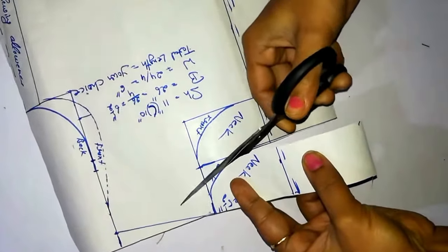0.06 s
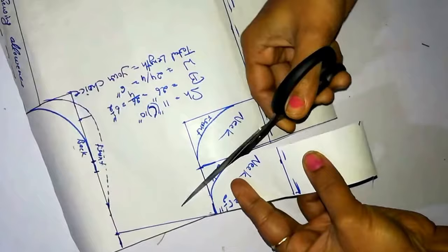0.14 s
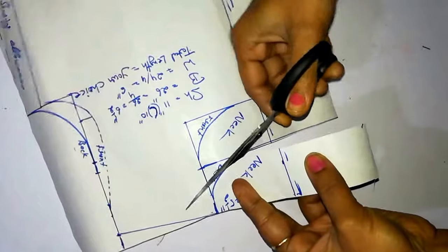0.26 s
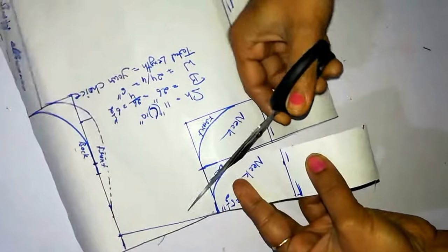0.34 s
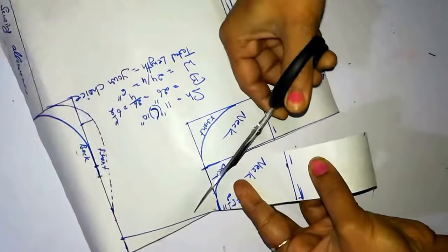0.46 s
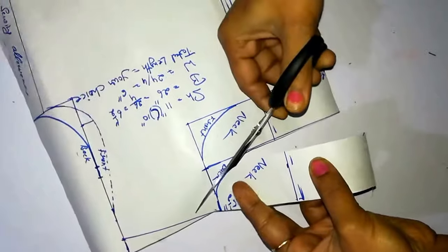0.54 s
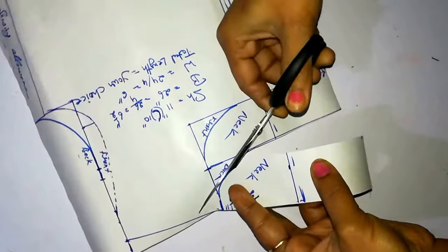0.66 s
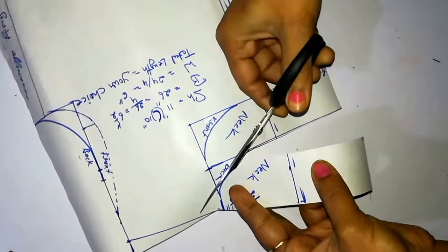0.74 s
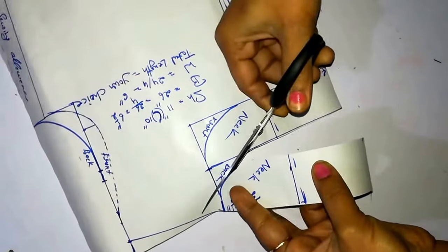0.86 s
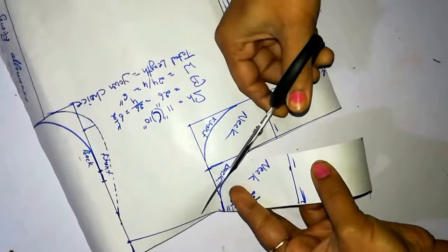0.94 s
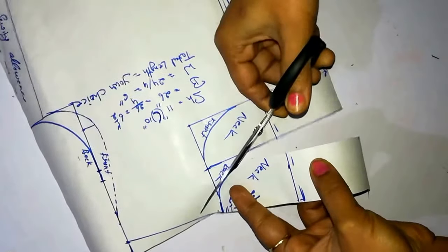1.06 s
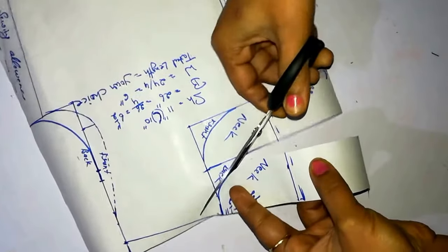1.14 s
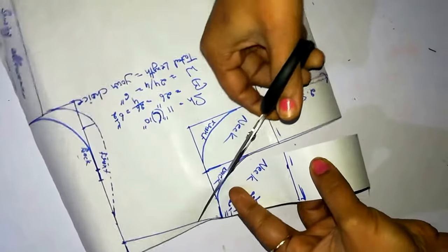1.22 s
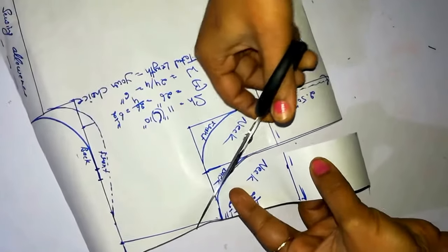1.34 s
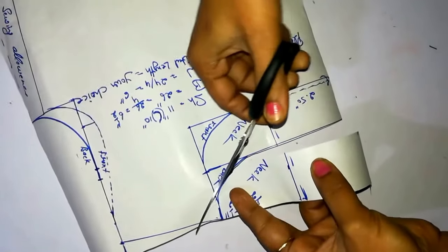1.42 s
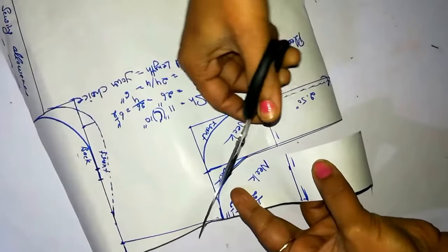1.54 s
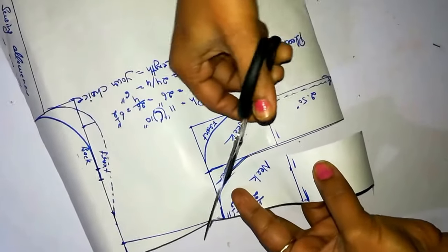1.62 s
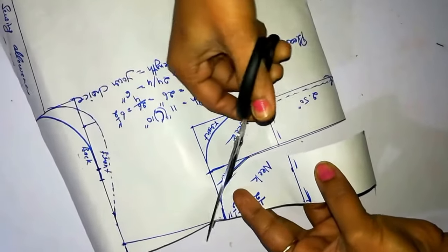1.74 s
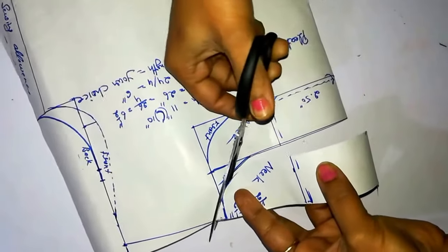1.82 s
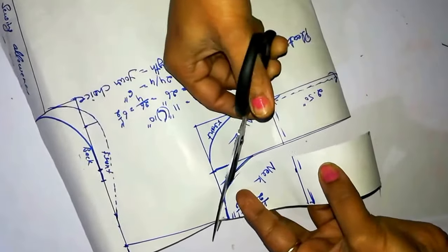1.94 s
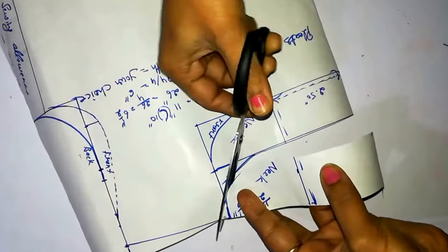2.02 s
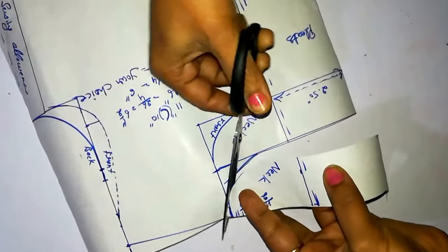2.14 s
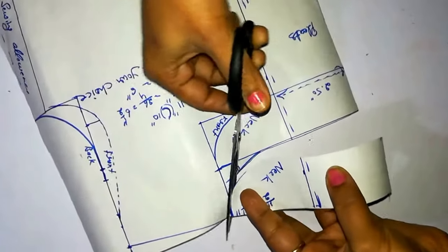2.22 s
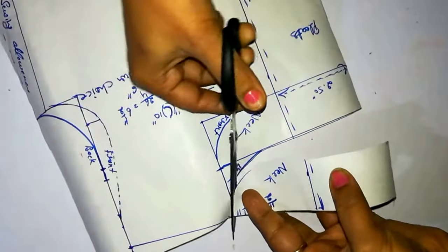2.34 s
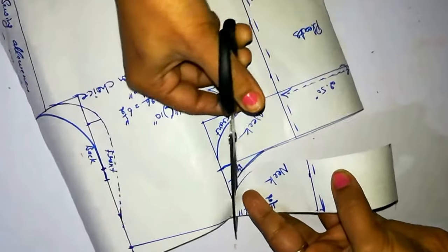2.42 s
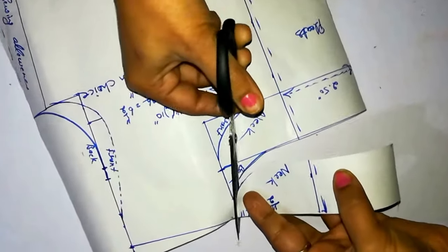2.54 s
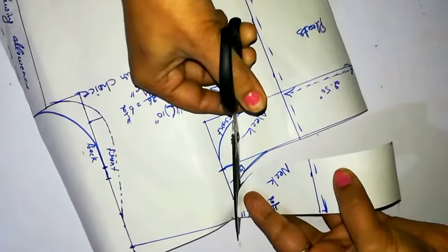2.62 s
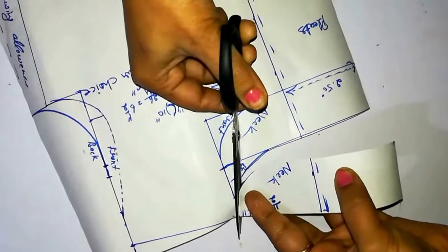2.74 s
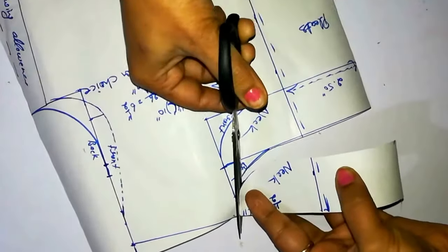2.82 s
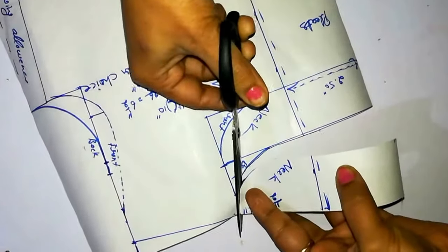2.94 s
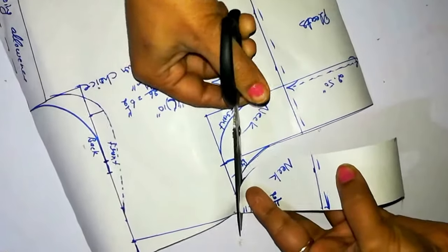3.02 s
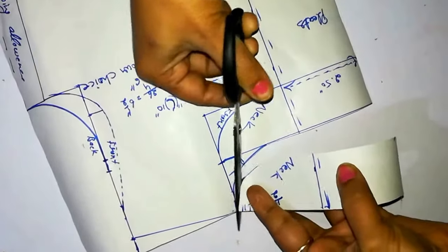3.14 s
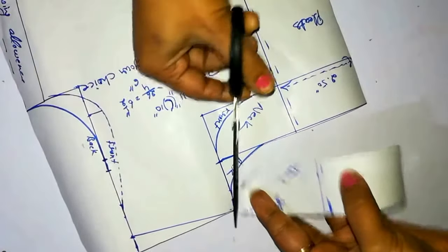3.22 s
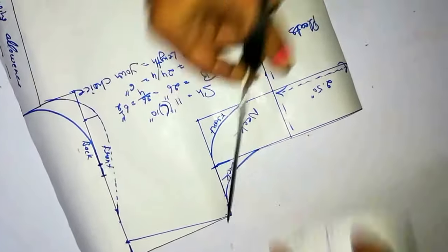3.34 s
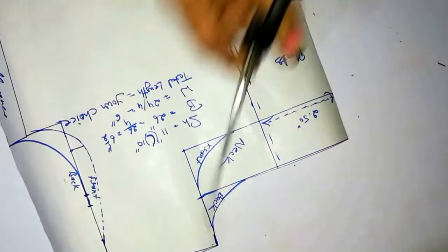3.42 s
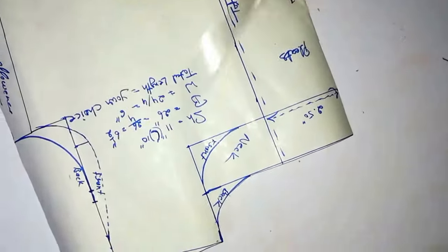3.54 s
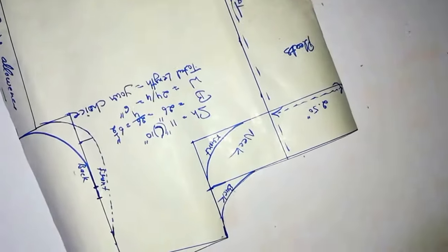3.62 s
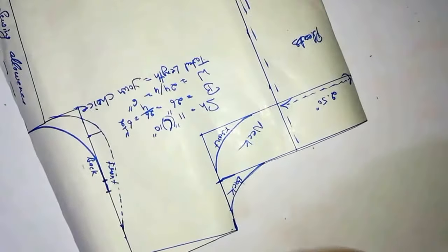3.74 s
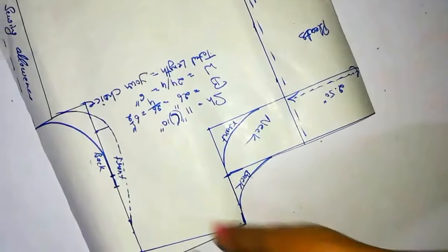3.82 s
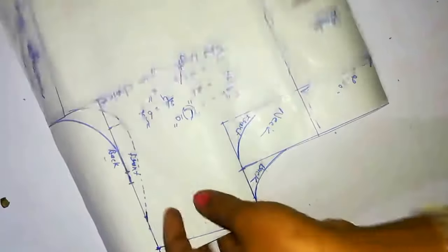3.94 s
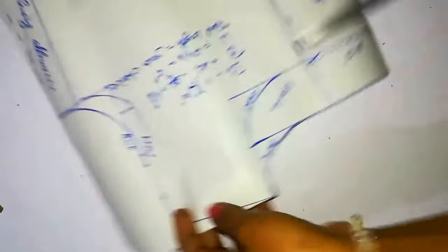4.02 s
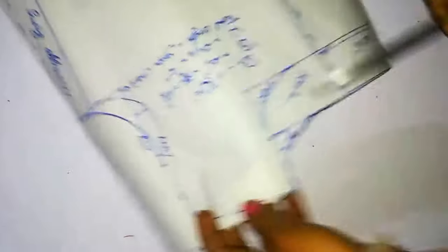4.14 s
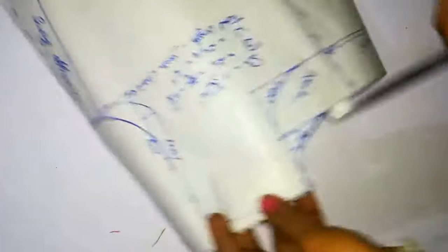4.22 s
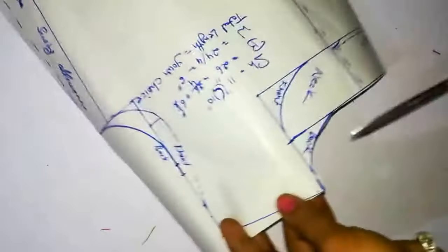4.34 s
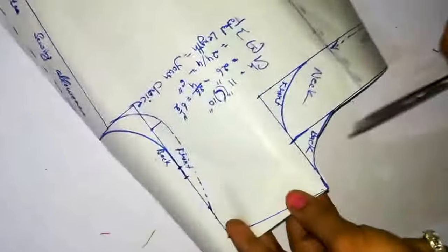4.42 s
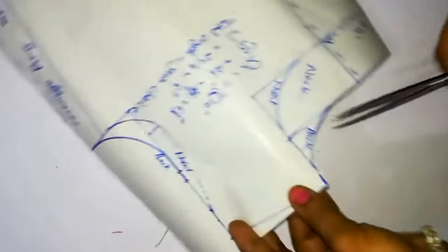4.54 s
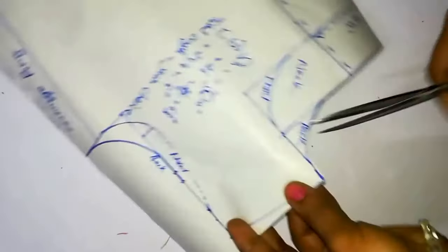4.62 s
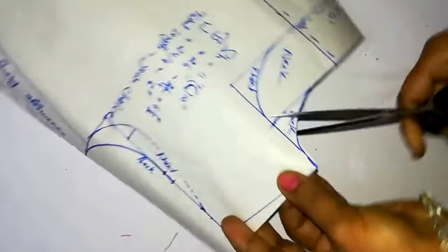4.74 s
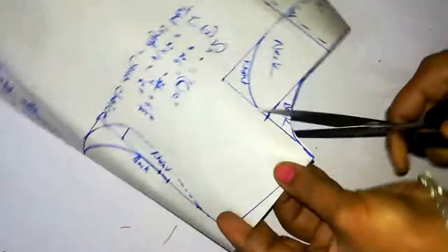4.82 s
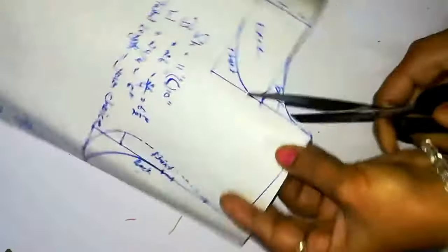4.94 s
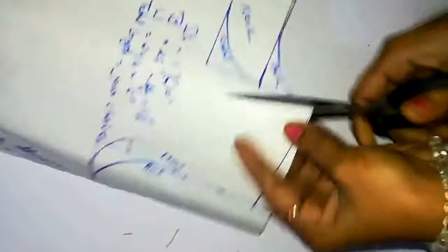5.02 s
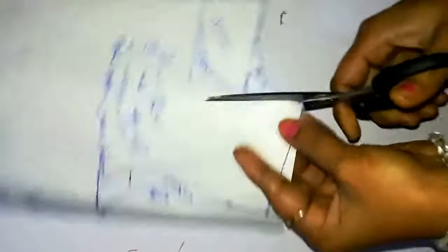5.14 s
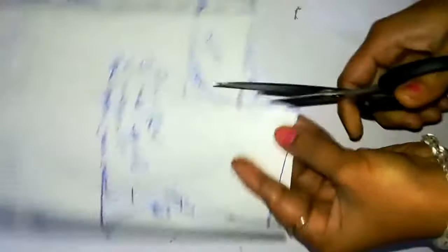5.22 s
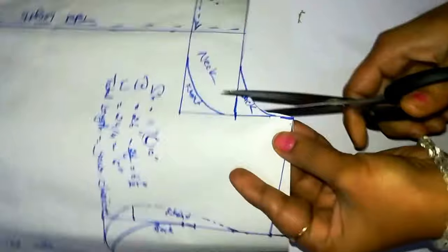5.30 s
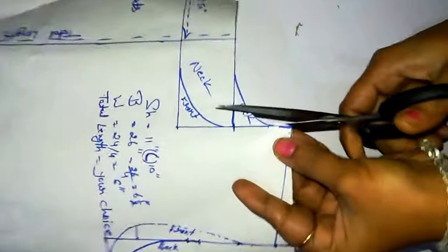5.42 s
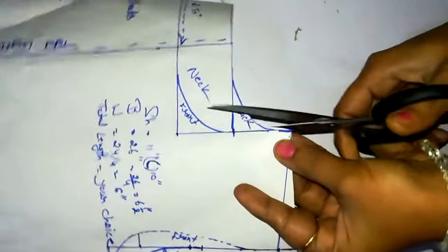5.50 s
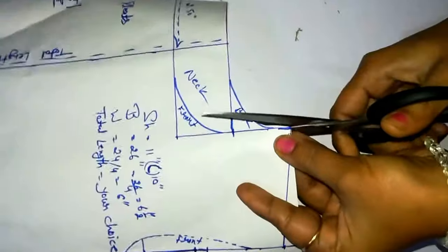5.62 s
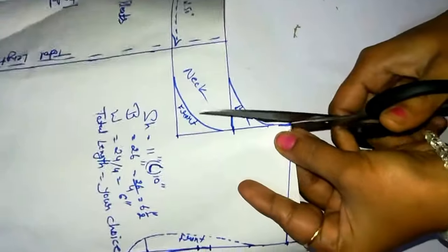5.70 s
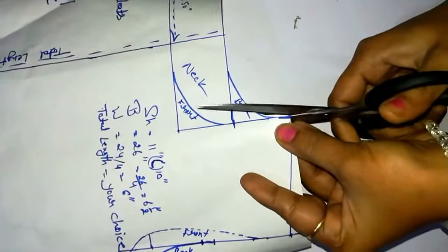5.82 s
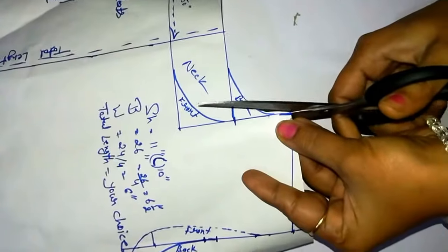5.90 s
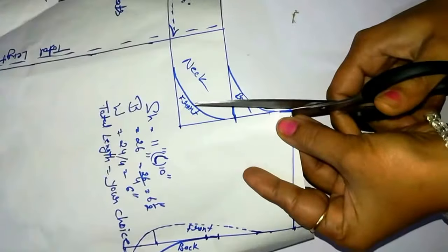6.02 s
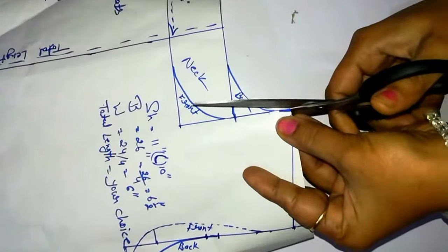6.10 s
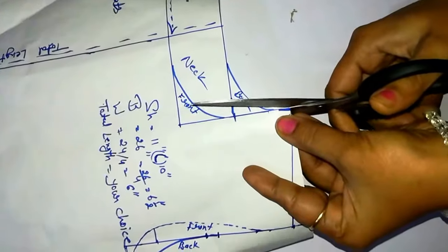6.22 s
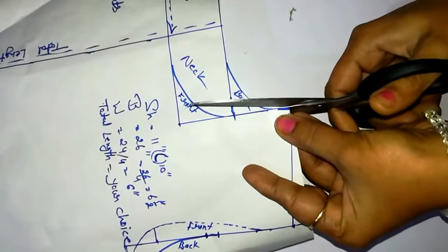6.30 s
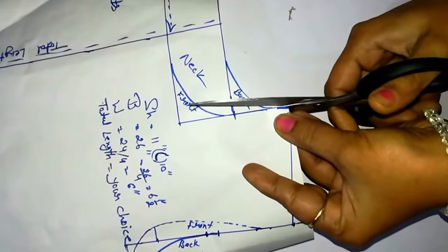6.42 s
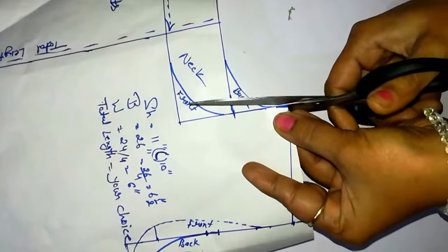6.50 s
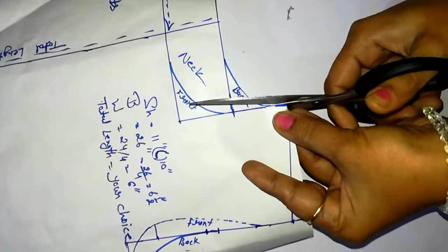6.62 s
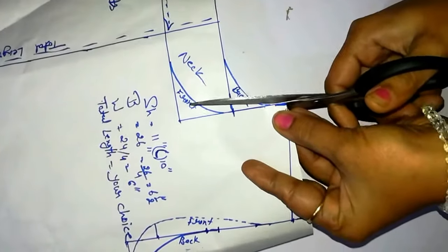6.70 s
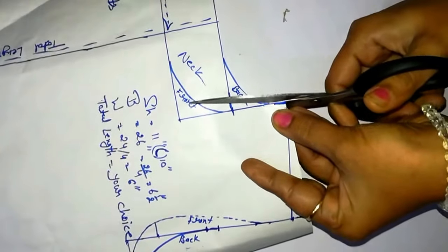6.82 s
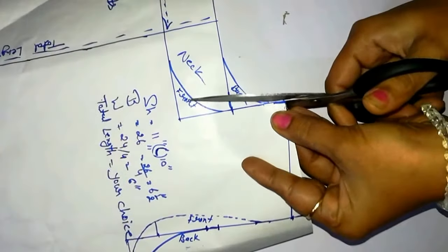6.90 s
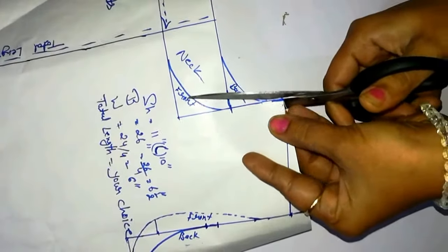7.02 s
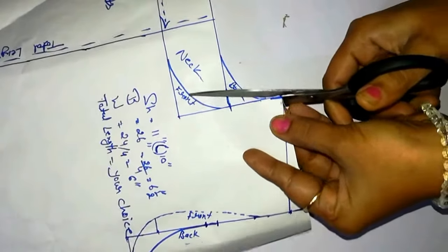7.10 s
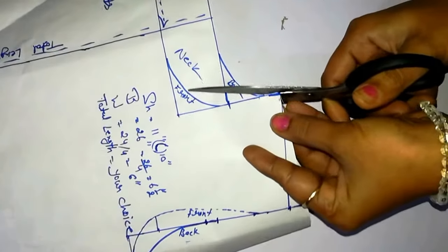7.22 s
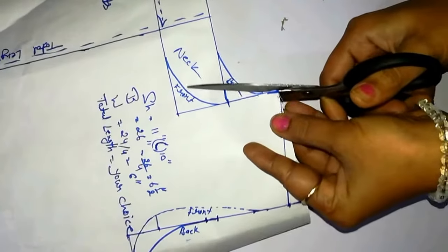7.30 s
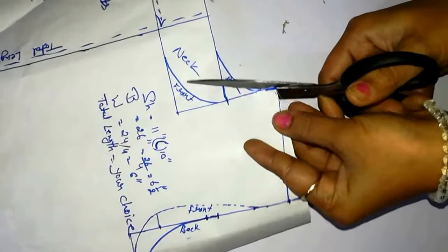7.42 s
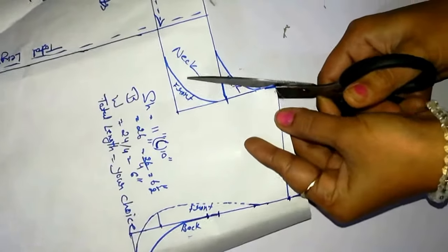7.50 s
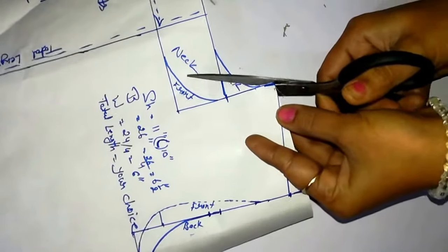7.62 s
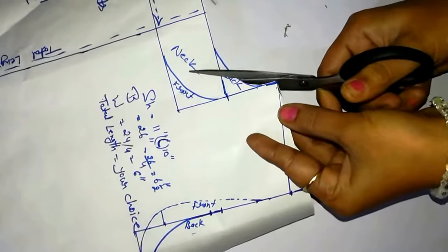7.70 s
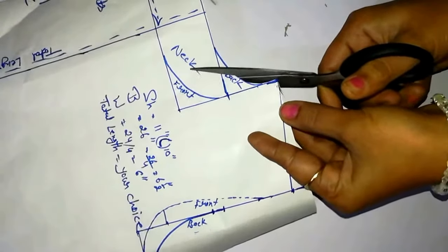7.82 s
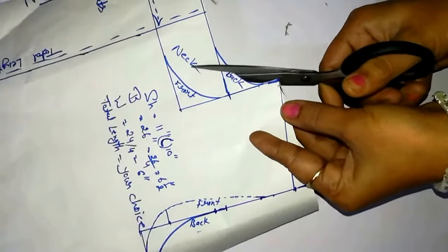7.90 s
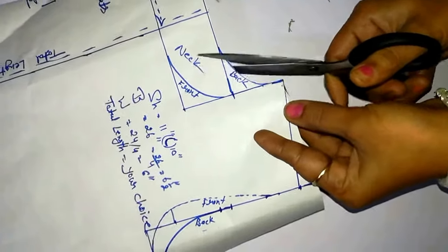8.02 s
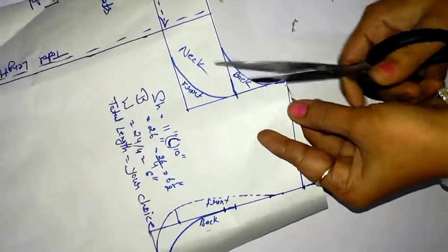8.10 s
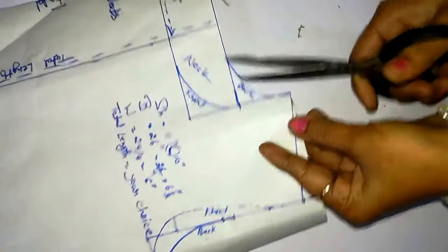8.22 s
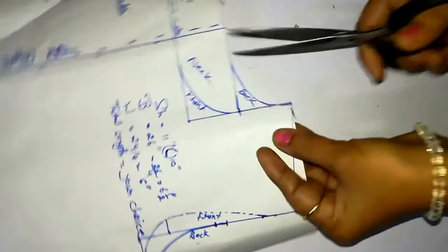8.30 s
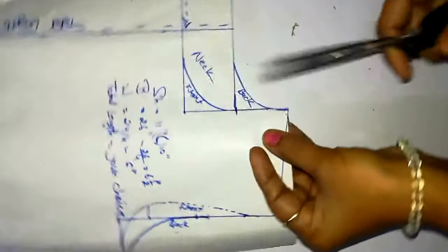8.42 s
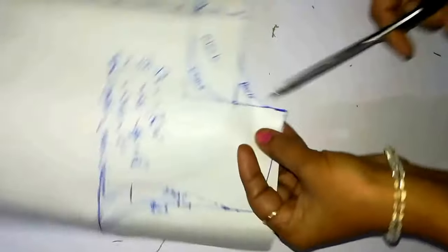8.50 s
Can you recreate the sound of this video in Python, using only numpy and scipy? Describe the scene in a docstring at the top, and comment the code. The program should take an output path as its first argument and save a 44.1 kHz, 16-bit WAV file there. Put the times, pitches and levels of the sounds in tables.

```python
"""A small hard room: scissors cut a folded paper pattern on a table, close to a phone with two ports.
A long slow cut tears the fibres in bursts of random clicks, filtered by the sheet and the edge; damped
resonances make the blades clack shut. The sheet is slid round, rubbing as filtered clicks and popping as
short decaying cycles; a second, gentler cut follows and the sheet is turned again, a fingertip groaning
as a falling tone. A diffuse tail of decaying noise and a low rumble under faint hiss surround it all."""
import sys
import numpy as np
from scipy import signal
from scipy.fft import rfft, irfft
from scipy.io import wavfile
from scipy.ndimage import uniform_filter1d

SR = 44100
rng = np.random.default_rng(int(sys.argv[2]) if len(sys.argv) > 2 else 0)


def generate_wav(sig):
    """Save sig (samples, or channels by samples) to the path in sys.argv[1] as 16-bit PCM at SR."""
    pcm = np.round(np.clip(np.atleast_2d(sig).T, -1, 1) * 32767).astype(np.int16)
    wavfile.write(sys.argv[1], SR, pcm)


N = 377055
TIME = np.arange(N) / SR
CLACK_S = 3.1286

# colour of the sheet: (frequency [Hz], density [dB per Hz])
SHEET = [(100, -21.5), (330, -19.5), (520, -21.5), (750, -12.5), (1100, -3), (1600, -1.5), (2500, -10.5),
         (4000, -13.5), (8000, -48)]
# colour of the tearing edge: (frequency [Hz], density [dB per Hz])
EDGE = [(600, -16.5), (2000, -3), (5500, -0.5), (8000, -10), (11000, -11), (16000, -21.5)]
# steel and handle resonances: (frequency [Hz], width [Hz], level before width weighting [dB])
SCISSORS = [(1670, 89, -4.5), (2480, 280, -9), (4745, 370, -0.5), (5750, 370, 3.5), (7060, 230, -3),
            (9700, 950, -7)]
# broad colour of the clack, summed over all directions: (frequency [Hz], density [dB per Hz])
CLACK_SPREAD = [(400, -20), (1500, -2.5), (2500, 3), (3400, -0.5), (6300, 4.5), (8500, -6.5), (11000, -2),
                (15500, -11)]


def undb(db):
    """Decibels to gain."""
    return np.exp(np.asarray(db) * np.log(10) / 20)


def unit(x):
    """Scale to rms 1."""
    return x / np.sqrt(np.mean(x ** 2))


def add(out, start_s, sound):
    """Mix a short sound in at start_s."""
    i = max(int(start_s * SR), 0)
    out[:, i:i + sound.shape[-1]] += sound[..., :max(N - i, 0)]


def colour(x, points, size=2048):
    """Causal minimum-phase filter through (Hz, dB) points, from the folded cepstrum."""
    hz, db = np.transpose(points)
    bins_hz = np.maximum(np.fft.rfftfreq(size, 1 / SR), 1)
    curve_db = np.interp(np.log(bins_hz), np.log(hz), db)
    cepstrum = irfft(np.log(undb(curve_db)))
    cepstrum[1:size // 2] *= 2
    cepstrum[size // 2 + 1:] = 0
    response = irfft(np.exp(rfft(cepstrum)))
    return signal.oaconvolve(x, response[None], axes=-1)[:, :x.shape[-1]]


def low_cut(x, hz):
    """Small, thin things radiate little bass."""
    return signal.sosfilt(signal.butter(2, hz, "high", fs=SR, output="sos"), x)


def resonate(x, hz, q):
    """One resonance of sharpness q."""
    return signal.lfilter(*signal.iirpeak(hz, q, SR), x)


def rings(x, modes):
    """A body rings on briefly at a few pitches."""
    return sum(undb(db) * resonate(x, hz, hz / width_hz) for hz, width_hz, db in modes)


def walk(rate_hz):
    """Random levels held 1 / rate_hz seconds and slewed; rms 1."""
    hold = int(SR / rate_hz)
    steps = np.repeat(rng.standard_normal(N // hold + 1), hold)
    return unit(uniform_filter1d(steps, hold)[:N])


def wandering(x, low_hz, high_hz, width_hz, swing_db, rate_hz, count):
    """Narrow resonances, spaced by ratio with a little scatter, that come and go, each on its own."""
    out, hold = 0, int(SR / rate_hz)
    pitches_hz = np.geomspace(low_hz, high_hz, count) * np.exp(.03 * rng.standard_normal(count))
    for hz in pitches_hz:
        swing = np.clip(1.2 * rng.standard_normal(N // hold + 2), -2, 1.5)
        knots = undb(swing_db * swing)
        gain = np.interp(TIME, np.arange(len(knots)) / rate_hz, knots)
        out = out + gain * resonate(x, hz, hz / width_hz)
    return unit(out)


def pair(x, apart):
    """Two unrelated signals as mid and side."""
    return x[0] + apart * np.array([x[1], -x[1]])


def ports(x, balance):
    """Tilt left against right by (Hz, left minus right dB) points."""
    return np.vstack([colour(port[None], [(hz, sign * db / 2) for hz, db in balance])
                      for port, sign in zip(x, (1, -1))])


def grains(rate_per_s, spread_db):
    """Two streams of tiny clicks: many small ones, a few large."""
    out = np.zeros((2, N))
    hit = rng.random((2, N), dtype=np.float32) < rate_per_s / SR
    chance = rng.standard_normal((2, N), dtype=np.float32)[hit]
    size = rng.standard_exponential((2, N), dtype=np.float32)[hit]
    out[hit] = np.sign(chance) * undb(spread_db * np.minimum(size, 4))
    return out


def room_tone(hiss_db=-67, waver_db=3.0, hum_db=-8):
    """A low rumble, mostly common to both ports, with hums that come and go, under a faint diffuse hiss."""
    # low rumble and faint hiss: (frequency [Hz], density [dB per Hz])
    tone = [(20, -3.5), (110, -11.5), (190, -16.5), (1000, -29.5), (2400, -45.5), (4800, -36),
            (16000, -55.5)]
    # slow swell of the rumble, before its waver: (time [s], level [dB])
    rumble = [(0, -64), (3.3, -63), (4, -66), (8.5, -67)]
    noise = unit(colour(rng.standard_normal((2, N)), tone, size=8192))
    low = signal.sosfilt(signal.butter(2, 300, "low", fs=SR, output="sos"), noise)
    high = low_cut(noise, 300)
    hums = wandering(pair(low, .5), low_hz=99.95, high_hz=235.4, width_hz=5.6, swing_db=6.5,
                     rate_hz=3.7, count=5)
    swell = undb(np.interp(TIME, *np.transpose(rumble)) + waver_db * walk(9.2))
    return (pair(low, 0.11) + undb(hum_db) * hums) * swell + undb(hiss_db) * high


def effort(strokes, release_s, rest_db):
    """Each stroke builds up, holds and dies away over a faint rest level; one gain curve per layer."""
    gains = np.full((3, N), undb(rest_db))
    for start_s, attack_s, held_s, *db in strokes:
        rise = np.minimum(TIME - start_s, 0) / attack_s
        fall = np.maximum(TIME - start_s - held_s, 0) / release_s
        gains = np.maximum(gains, undb(db)[:, None] * np.exp(rise - fall))
    return gains


def moving_hands(x):
    """Reflections off the moving hands and the curling sheet shift the colour at each port."""
    share, lag_s, travel_s = .45, .0009, .00022
    echoes = [np.interp(TIME - lag_s - travel_s * walk(5), TIME, port) for port in x]
    return (x + share * np.array(echoes)) / np.hypot(1, share)


def tensioned(x):
    """All pitches of the sheet rise when taut and fall when slack, by resampling."""
    # tension of the sheet: (time [s], pitch ratio [1])
    tension = [(.4, 1.015), (1.2, 1.127), (2.4, 0.99), (3.35, 1.32), (4.2, 1.19), (4.35, 0.91), (5.42, .88),
               (6.9, .92), (7.45, 1.095)]
    place = np.cumsum(np.interp(TIME, *np.transpose(tension))) % (N - 1)
    return np.array([np.interp(place, np.arange(N), port) for port in x])


def friction(gains, snag_share, flutter_db, body_db, ring_db, hiss_db, hiss_ring_db, fizz_db):
    """Fibres catch and let go: the bending sheet crackles, the contact itself hisses finer and steadier."""
    # colour of the rubbing contact: (frequency [Hz], density [dB per Hz])
    hiss_colour = [(500, -20.5), (1500, -11), (2400, -5), (4800, -2.5), (5600, -7.5), (6700, -13.5),
                   (9000, -32.5), (15000, -38)]
    # colour of the fine fizz: (frequency [Hz], density [dB per Hz])
    fizz_colour = [(3000, -43), (6000, 0.5), (8000, 3), (10500, 0.5), (16000, -8.5)]
    snags_per_s, snag_decay_s = 210, .0012  # fibres that hold a little longer
    fibres_per_s, fibre_spread_db = 1500, 2.8  # crackle, before tension; the hiss has 4 times as many

    catches = np.abs(grains(snags_per_s, 0.94)[0])
    snags = unit(signal.lfilter([1], [1, -np.exp(-1 / (snag_decay_s * SR))], catches))
    grip = unit(1 + snag_share * snags)

    fibres = moving_hands(pair(grains(fibres_per_s, fibre_spread_db), 0.16))
    crackle = unit(tensioned(colour(fibres, SHEET)) * grip)
    bending = wandering(crackle, low_hz=850, high_hz=1993, width_hz=71, swing_db=6.5, rate_hz=21, count=11)
    body = unit(crackle + undb(ring_db) * bending) * undb(flutter_db * walk(70))

    fine = moving_hands(grains(4 * fibres_per_s, fibre_spread_db)) * grip ** .7
    hiss = unit(colour(fine, hiss_colour))
    singing = wandering(hiss, low_hz=1888, high_hz=5890, width_hz=72, swing_db=7.5, rate_hz=14, count=12)
    hiss = unit(hiss + undb(hiss_ring_db) * singing)
    fizz = unit(colour(fine, fizz_colour))
    layers = undb(body_db) * body, undb(hiss_db) * hiss, undb(fizz_db) * fizz
    return sum(layer * gain for layer, gain in zip(layers, gains))


def tears(body_gain_db=1.0, edge_gain_db=-0.5):
    """Each bunch of fibres parts in a swell of snaps a few milliseconds long."""
    # fibres tearing or creasing, before the gains: (crest [s], sheet body [dB], crisp edge [dB])
    bunches = [(.091, -42.5, -39), (.148, -46, -47), (.373, -49, -49.5), (.752, -49.5, -57),
               (.785, -56, -53), (.843, -45.5, -49), (.875, -49, -50), (.938, -43, -57), (1.473, -51, -62),
               (1.533, -47.5, -65), (1.841, -50, -56), (1.887, -49, -57.5), (1.939, -54, -72),
               (2.087, -40.5, -45.5), (2.116, -49, -44), (2.165, -49, -41.5), (2.193, -38, -42.5),
               (2.232, -38.5, -34.5), (2.398, -40.5, -39), (2.453, -36.5, -41.5), (2.547, -38.5, -34.5),
               (2.575, -38.5, -56), (2.822, -58, -59), (3.33, -62.5, -54), (3.356, -67, -54),
               (3.399, -55.5, -42), (4.07, -43, -51), (4.14, -51, -37), (4.356, -39.5, -41),
               (4.598, -34, -60), (5.13, -37.5, -41), (5.144, -33.5, -42), (5.398, -45, -55),
               (6.398, -42.5, -45.5), (7.138, -41.5, -52), (7.161, -50, -52.5), (7.23, -48.5, -57),
               (7.718, -52, -47), (7.923, -54.5, -69), (8.164, -46, -53.5)]
    rise_s, fall_s = 0.003, 0.0039
    force, t = np.zeros((2, N)), np.arange(-SR // 50, SR // 50) / SR
    swell = np.exp(-(t / np.where(t < 0, rise_s, fall_s)) ** 2 / 2)
    for crest_s, body_db, edge_db in bunches:
        add(force, crest_s + t[0], undb([[body_db], [edge_db]]) * swell)
    body = unit(colour(pair(grains(4500, 1.5), 0.31), SHEET))
    # the bending sheet rings at changing pitches
    body = unit(body + wandering(body, low_hz=740, high_hz=3230, width_hz=180, swing_db=9,
                                 rate_hz=28, count=8))
    edge = unit(colour(pair(grains(6500, 1.7), 1.0), EDGE))
    return undb(body_gain_db) * force[0] * body + undb(edge_gain_db) * force[1] * edge


def buckle(drive_db, hz, crisp_db, crack_s=0.0034, crack_db=-5, rustle_db=-20, rustle_s=0.021):
    """A patch flips, the harder the more abruptly: brief cycles at its pitch, a rebound off the fold, a crack."""
    cycles_to_crest = np.interp(drive_db, [-34, -22], [.85, .46])
    rebound_share, rebound_lag = .35, int(rng.uniform(.0018, .003) * SR)  # lag in samples
    t = np.arange(SR // 25) / SR
    age = t * hz / cycles_to_crest
    flip = age * np.exp(1 - age) * -np.sin(2 * np.pi * hz * t)
    flip = flip + rebound_share * np.pad(flip, (rebound_lag, 0))[:len(t)]
    crack = unit(colour(pair(rng.standard_normal((2, len(t))), 0.84), EDGE)) * np.exp(-t / crack_s)
    rustle = unit(colour(rng.standard_normal((2, len(t))), SHEET)) * np.exp(-t / rustle_s)
    return flip + undb(crisp_db + crack_db) * crack + undb(rustle_db) * rustle


def pops(gain_db=1.0):
    """Single buckles, and a quick run of them as the pushed edge catches and slips."""
    # the sheet buckling, before gains: (time [s], level [dB], pitch [Hz], crisp edge re body [dB])
    buckles = [(.457, -43.5, 1600, 7.5), (0.5161, -31, 1400, 0), (.586, -41, 1380, -18),
               (0.9091, -25.5, 1440, -18), (.912, -30.5, 1520, -18), (1.095, -40.5, 1530, -18),
               (1.161, -44.5, 1460, -17), (1.707, -46, 1420, -14), (1.816, -41.5, 1484, -11),
               (2.105, -36.5, 1400, -9), (2.1335, -37.5, 1460, -8), (2.2671, -26.5, 1470, -4),
               (2.2688, -27.5, 1560, -11), (2.304, -28.5, 1200, -5), (2.384, -36.5, 1330, -23),
               (3.953, -47.5, 720, -0.5), (4.402, -33, 1200, -13), (4.7554, -21.5, 2060, -11),
               (4.807, -21.5, 1335, -4.5), (4.8226, -19.5, 1074, -3), (5.0164, -33, 1080, -18),
               (5.0205, -22, 1248, -17), (5.0855, -20.5, 1230, -27), (5.1456, -22, 1180, -12),
               (5.2462, -31.5, 1268, 7.5), (5.268, -35.5, 1380, 5), (5.34, -31, 1110, -3),
               (5.395, -29, 1100, -8), (5.687, -42, 870, -16), (6.323, -38, 1045, -31),
               (6.3858, -30, 1680, -18), (6.526, -35.5, 1340, -15.5), (7.012, -30.5, 1490, -25),
               (7.1328, -35.5, 1450, -12), (8.263, -37.5, 1160, -15), (8.3767, -26.5, 1240, -9),
               (8.516, -29, 1300, -15), (8.539, -32, 1140, 2)]
    # the edge juddering: (start [s], end [s], slips [per s], full level [dB])
    judder = (4.536, 4.59, 135, -24)
    out = np.zeros((2, N))
    for s, db, hz, crisp_db in buckles:
        add(out, s, undb(db + gain_db) * buckle(db, hz, crisp_db))
    start_s, end_s, slips_per_s, db = judder
    for s in np.arange(start_s, end_s, 1 / slips_per_s):
        push = min((s - start_s) / (end_s - start_s) + 0.35, 1)
        slip_s = s + rng.normal(0, .0006)
        hz = 1250 * np.exp(rng.normal(0, .15))
        add(out, slip_s, push * undb(db) * buckle(db, hz, -13))
    return out


def ticks(decay_s=0.0038, ring_db=-7, scrape_db=-8):
    """Blade brushes blade: a short scrape that sets the steel ringing."""
    # light touches of the blades, before the layer gains: (time [s], level [dB])
    touches = [(1.815, -50.5), (2.7869, -34.5), (5.852, -39)]
    out, t = np.zeros((2, N)), np.arange(SR // 20) / SR
    for s, db in touches:
        noise = rng.standard_normal((2, len(t)))
        scrape = undb(scrape_db) * unit(colour(noise, CLACK_SPREAD))
        ring = undb(ring_db) * unit(rings(noise, SCISSORS))
        add(out, s, undb(db) * (scrape + ring) * np.exp(-t / decay_s))
    return out


def sings():
    """Rubbed steel or a paper edge: a short swell in one resonance."""
    # swells: (crest [s], rms level at crest [dB], pitch [Hz], Gaussian half-length [s], sharpness Q [1])
    swells = [(1.98, -62.5, 1670, 0.049, 10), (4.204, -44.5, 1880, 0.027, 25),
              (6.418, -57.5, 3100, 0.035, 3.6), (6.556, -59.5, 5030, .018, 16), (7.0, -62, 5295, 0.079, 14)]
    rub = rng.standard_normal((2, N))
    return sum(undb(db) * np.exp(-((TIME - s) / length_s) ** 2 / 2) * unit(resonate(rub, hz, q))
               for s, db, hz, length_s, q in swells)


def clack(level_db=2, scrape_s=0.0044, scrape_db=-24, crack_db=-12, crack_s=0.0012):
    """The tips shear the last fibres, then the blades hit their stop; the hand damps most of the ring."""
    t = np.arange(SR // 20) / SR
    blow = sum(width_hz * undb(db) * np.sin(2 * np.pi * hz * t) * np.exp(-np.pi * width_hz * t)
               for hz, width_hz, db in SCISSORS)
    noise = unit(colour(pair(rng.standard_normal((2, len(t))), .8), CLACK_SPREAD))
    crack = undb(crack_db) * noise * np.exp(-t / crack_s)
    out = np.zeros((2, N))
    add(out, CLACK_S, blow / np.abs(blow).max() + crack)
    shear = noise[:, -int(scrape_s * SR):]
    add(out, CLACK_S - scrape_s, undb(scrape_db) * shear * np.linspace(.5, 1, shear.shape[1]))
    return undb(level_db) * out


def clack_outwards(level_db=12):
    """The same blow sent into the room; over all directions its peaks and dips even out."""
    return undb(level_db) * colour(signal.unit_impulse(N, int(CLACK_S * SR))[None], CLACK_SPREAD)


def blade_ring(t60_s=0.38):
    """The thin steel tones that outlast the blow, out of step at the two ports."""
    # faint blade tones: (frequency [Hz], peak level [dB])
    tones = [(1529, -45.5), (2977, -48), (4673, -48.5), (5626, -45.5), (6007, -46), (6728, -45.5),
             (10466, -53), (10997, -53)]
    out, t = np.zeros((2, N)), np.arange(SR // 2) / SR
    for hz, db in tones:
        phase = rng.uniform(0, 3.1, (2, 1))
        add(out, CLACK_S, undb(db - 60 * t / t60_s) * np.sin(2 * np.pi * hz * t + phase))
    return out


def table_top():
    """Soft bumps of the hands on the table: decaying sines."""
    # bumps: (time [s], starting level [dB], pitch [Hz], ring t60 [s])
    bumps = [(3.345, -45.5, 118, 0.16), (3.951, -45, 234, 0.07), (4.066, -47.5, 285, 0.06),
             (6.386, -48, 546, 0.029)]
    out, t = np.zeros((2, N)), np.arange(SR // 4) / SR
    for s, db, hz, t60_s in bumps:
        add(out, s, undb(db - 60 * t / t60_s) * np.sin(2 * np.pi * hz * t))
    return out


def drag(start_s=8.452, length_s=0.085, level_db=-40, octave_db=-22):
    """A fingertip drags on the table, close and dry: a groan whose pitch sinks as it slows."""
    start_hz, sag_hz_per_s = 283.3, 1290
    attack_s, release_s = 0.0056, 0.035
    t = np.clip(TIME - start_s, 0, length_s)
    pressure = np.clip(np.minimum(t / attack_s, (length_s - t) / release_s), 0, 1)
    phase = 2 * np.pi * (start_hz - sag_hz_per_s * t / 2) * t
    return undb(level_db) * pressure * (np.sin(phase) + undb(octave_db) * np.sin(2 * phase))


def room(x, wet_db=-10, t60_s=0.33, delay_s=0.004):
    """Bare walls return a diffuse tail, different at each port."""
    # colour of the tail: (frequency [Hz], density [dB per Hz])
    echo = [(100, -1), (600, 3.5), (1500, -6), (6000, -3), (10000, -3), (16000, -12.5)]
    t = np.arange(SR) / SR
    tail = colour(rng.standard_normal((2, SR)) * undb(-60 * t / t60_s) * (t > delay_s), echo)
    return undb(wet_db) * signal.oaconvolve(x, unit(tail) / np.sqrt(SR), axes=-1)[:, :N]


def scene():
    """Cutting, sliding and the small knocks, all in the room."""
    # squeezes of the handles; levels before the layer gains:
    # (time [s], attack [s], hold [s], sheet crackle [dB], blade hiss [dB], fine fizz [dB])
    squeezes = [(.09, 0.031, 0.056, -52.5, -55, -57), (.415, 0.054, .12, -51.5, -54, -54.5),
                (.57, 0.022, 0.085, -64.5, -59, -56.5), (.76, 0.055, 0.18, -53, -60, -65),
                (1.05, 0.046, 0.1, -63, -59.5, -69), (1.16, 0.017, 0.17, -59, -55, -63),
                (1.44, 0.073, 0.083, -55, -66.5, -69), (1.835, 0.015, 0.1, -58, -67, -70),
                (2.1, 0.0072, 0.49, -52, -59, -62.5), (2.77, 0.085, 0.026, -66.5, -67, -72),
                (2.865, .008, 0.04, -64, -74, -80), (3.09, 0.03, 0.03, -68, -61.5, -69),
                (5.86, 0.0068, 0.036, -64.5, -58.5, -59), (6.33, 0.004, 0.061, -59, -78, -78),
                (6.87, 0.056, 0.053, -57.5, -52, -56), (6.95, .02, 0.18, -58, -54.5, -60.5),
                (7.13, 0.028, 0.17, -55, -55.5, -63), (7.39, 0.052, 0.13, -58.5, -53.5, -61.5),
                (7.65, 0.023, 0.15, -70, -62, -63), (7.708, 0.01, 0.017, -54.5, -53, -54.5),
                (7.903, 0.0054, 0.022, -59, -59.5, -72), (7.99, 0.029, 0.051, -64, -63, -65.5),
                (8.165, 0.027, 0.036, -58.5, -55.5, -63.5)]
    # pushes sliding the sheet over the table; levels before the layer gains:
    # (time [s], attack [s], hold [s], sheet crackle [dB], rubbing hiss [dB], fine fizz [dB])
    pushes = [(3.335, 0.022, 0.084, -68, -59.5, -60), (3.64, 0.015, 0.0054, -85, -62, -55.5),
              (4.022, 0.0067, 0.15, -51, -41, -48), (4.185, 0.027, 0.044, -45, -40.5, -48.5),
              (4.3, 0.023, 0.27, -54.5, -55, -67.5), (4.55, 0.03, 0.11, -49, -42.5, -51.5),
              (4.7, 0.022, 0.2, -54.5, -47.5, -53), (4.89, .02, 0.29, -55.5, -52.5, -56.5),
              (5.13, 0.021, 0.12, -53.5, -48.5, -52), (5.245, 0.022, 0.04, -55, -44, -45),
              (5.31, .025, .04, -50.5, -43, -45), (5.397, 0.011, 0.029, -43, -43.5, -50),
              (5.52, .02, .04, -72, -58.5, -61), (8.3, 0.035, 0.08, -72, -54.5, -58.5),
              (8.4, 0.049, 0.17, -50, -41, -46.5)]
    # the table and the sheet lying on it: (frequency [Hz], width [Hz], gain [dB])
    table_modes = [(291.5, 99, 5.5), (1050, 8.3, -7.5), (1290, 22, -11.5)]
    # the closed blades face the ports unevenly: (frequency [Hz], left minus right [dB])
    clack_side = [(2800, 0), (5000, 2), (8500, -2.5)]

    squeeze = effort(squeezes, release_s=0.03, rest_db=-77.0)
    push = effort(pushes, release_s=0.038, rest_db=-84)
    # snags jolt the contact more between the blades than flat on the table
    cutting = friction(squeeze, snag_share=.95, flutter_db=2.0, body_db=-1, ring_db=-7,
                       hiss_db=0.5, hiss_ring_db=-5.5, fizz_db=-3.5)
    sliding = friction(push, snag_share=.4, flutter_db=1.8, body_db=-2.0, ring_db=-1,
                       hiss_db=-1.5, hiss_ring_db=-3.5, fizz_db=-1.5)
    buckling = low_cut(pops(), hz=637)
    paper = cutting + sliding + tears() + buckling
    near = paper + rings(sliding + buckling, table_modes) + sings() + ticks() + table_top()
    steel = ports(low_cut(clack(), hz=1150), clack_side) + blade_ring()
    return near + steel + drag() + room(near + clack_outwards()) + room_tone()


def record(dry):
    """Each port colours the sound its own way; the phone clips the highest peaks and cuts the top."""
    # the two microphone ports: (frequency [Hz], left minus right [dB])
    balance = [(200, -0.5), (700, 3.5), (1290, -1), (2400, 0), (4400, 4.5), (6000, 0.5), (8200, -9.5),
               (15000, -8.5)]
    top_hz = 15900
    held = np.clip(ports(dry, balance), -.74, .74)
    return signal.sosfilt(signal.ellip(10, .2, 70, top_hz, fs=SR, output="sos"), held)


dry = scene()
out = record(dry)
generate_wav(out)
```